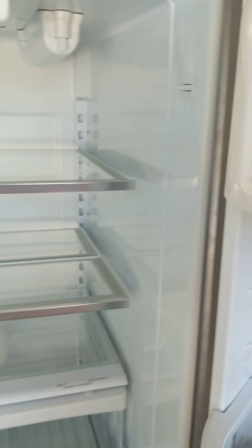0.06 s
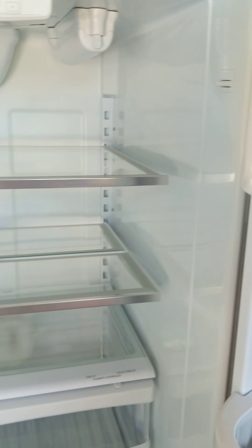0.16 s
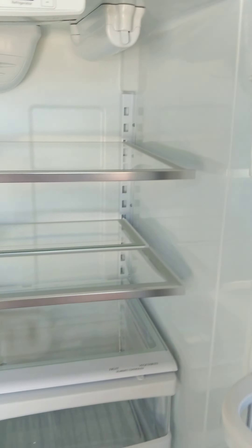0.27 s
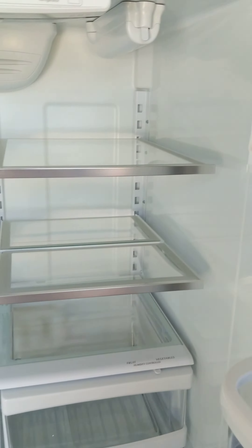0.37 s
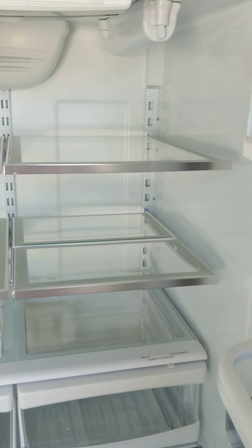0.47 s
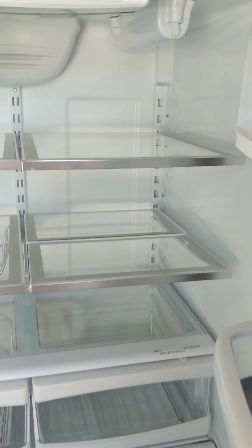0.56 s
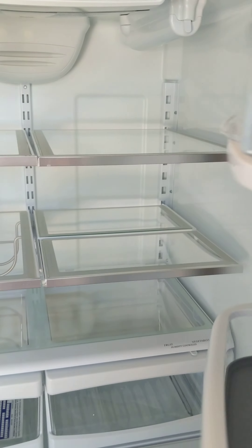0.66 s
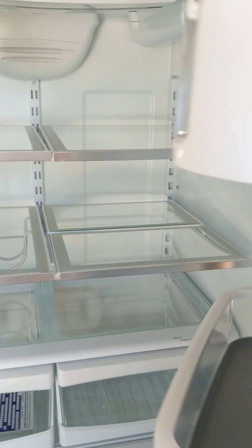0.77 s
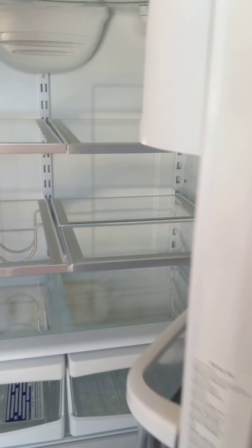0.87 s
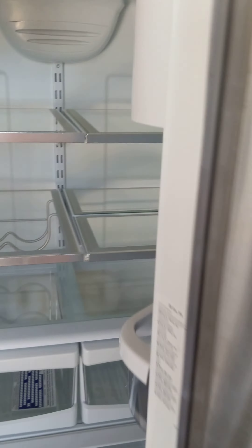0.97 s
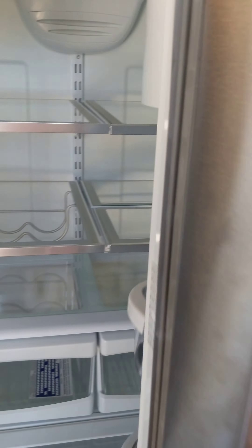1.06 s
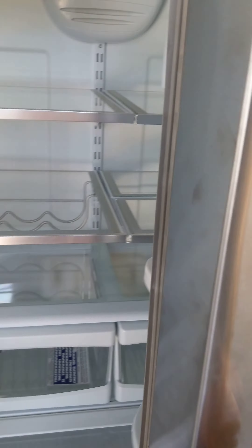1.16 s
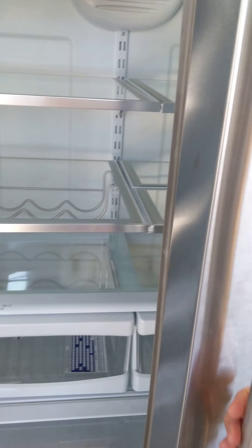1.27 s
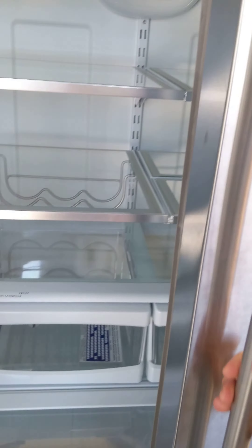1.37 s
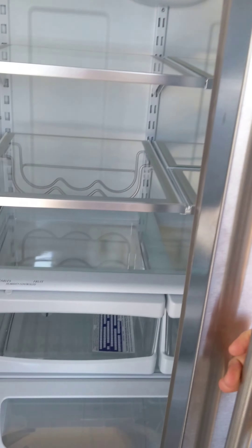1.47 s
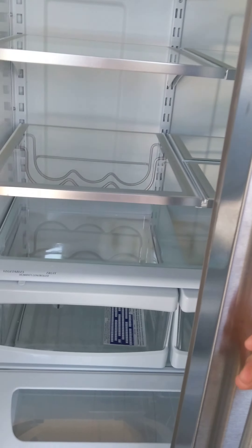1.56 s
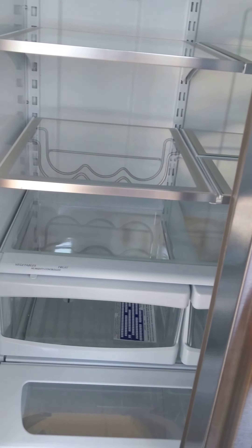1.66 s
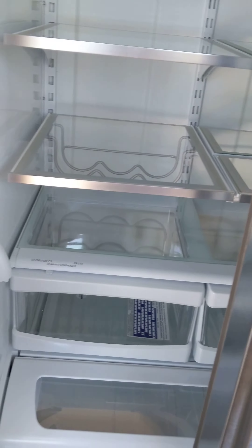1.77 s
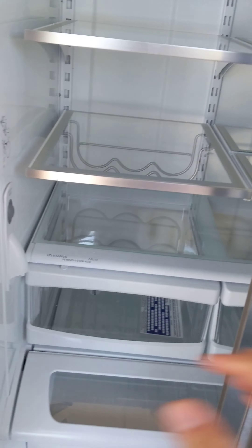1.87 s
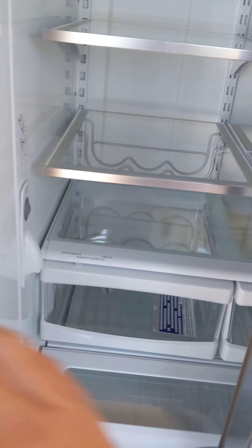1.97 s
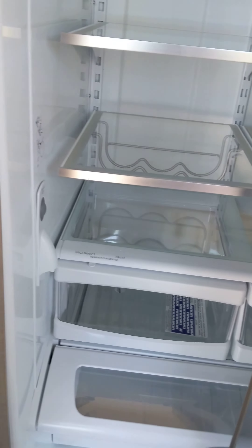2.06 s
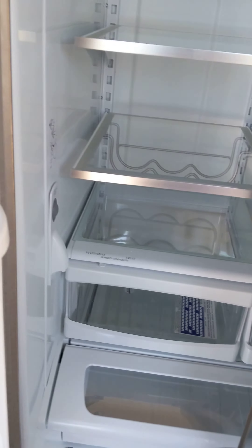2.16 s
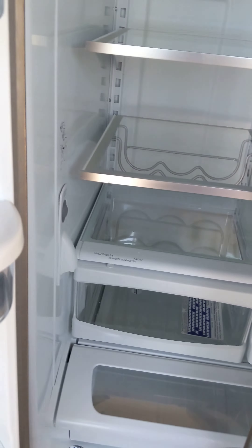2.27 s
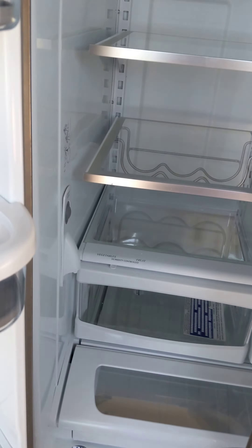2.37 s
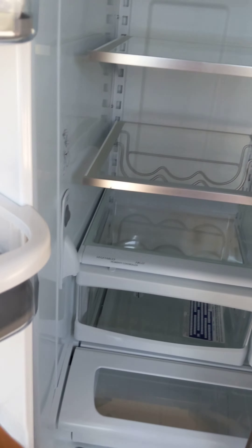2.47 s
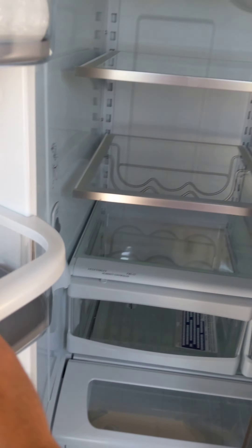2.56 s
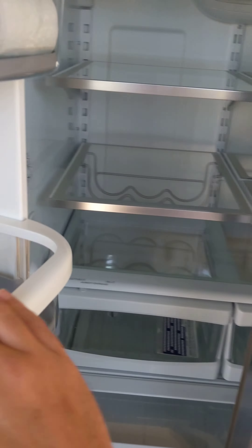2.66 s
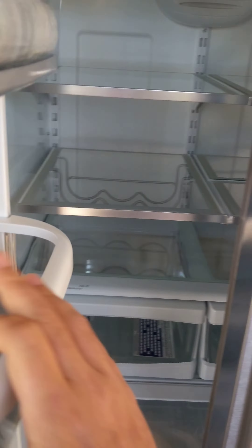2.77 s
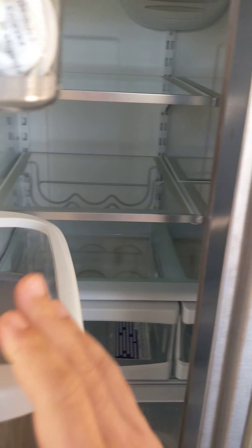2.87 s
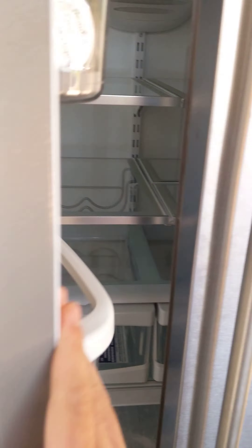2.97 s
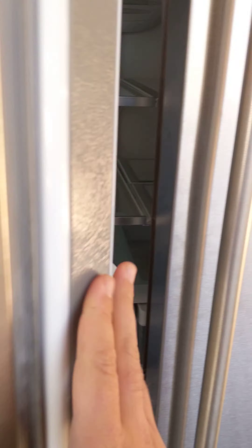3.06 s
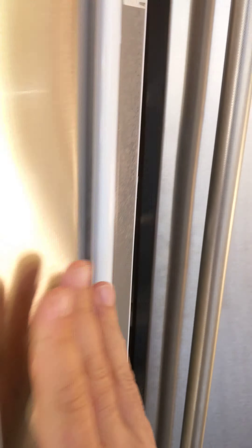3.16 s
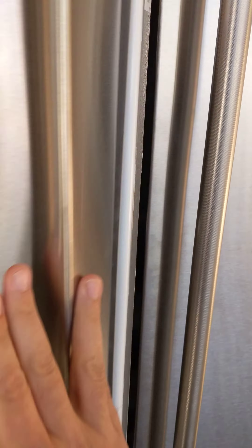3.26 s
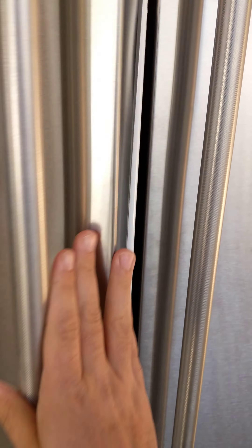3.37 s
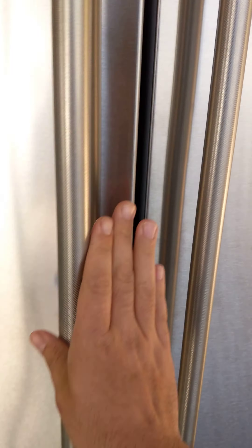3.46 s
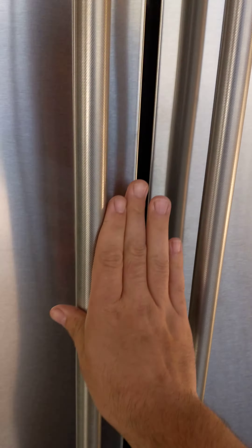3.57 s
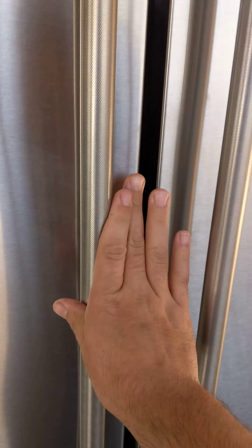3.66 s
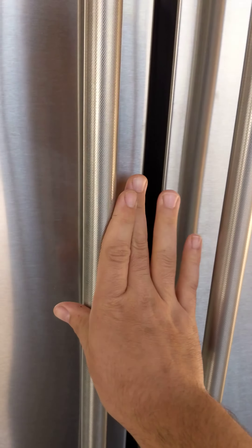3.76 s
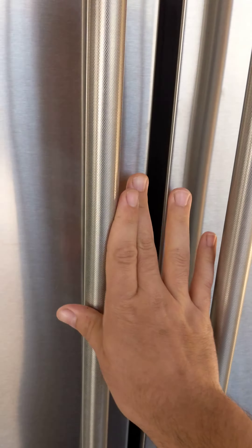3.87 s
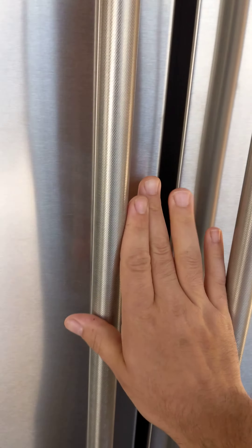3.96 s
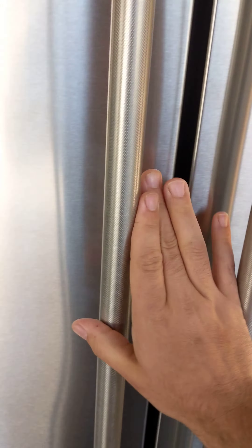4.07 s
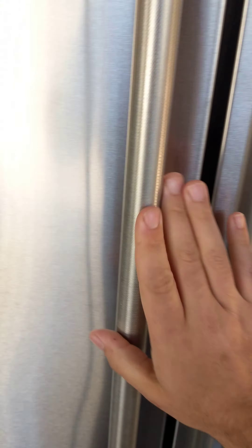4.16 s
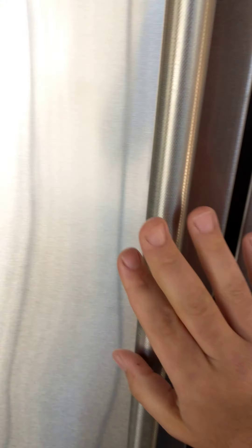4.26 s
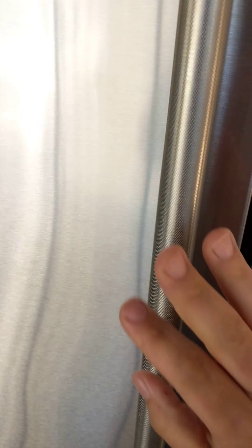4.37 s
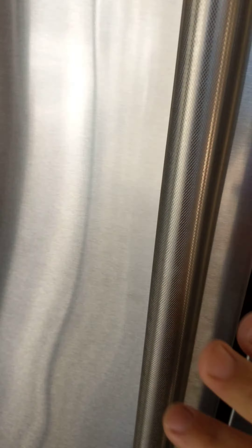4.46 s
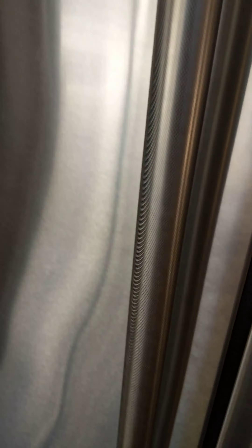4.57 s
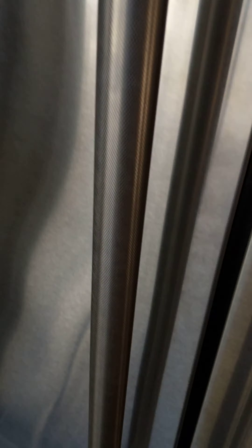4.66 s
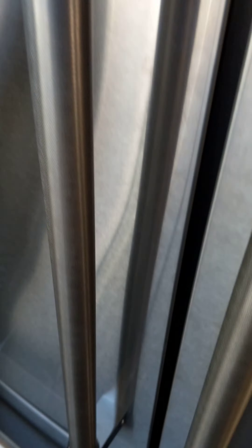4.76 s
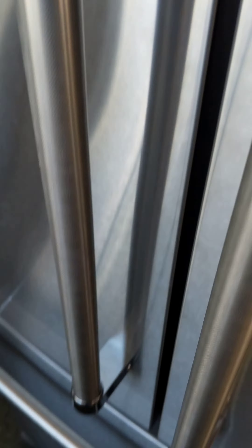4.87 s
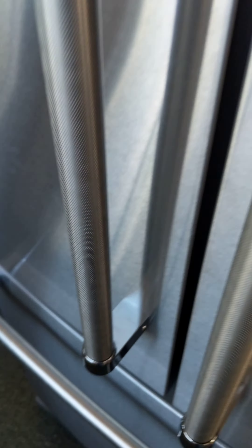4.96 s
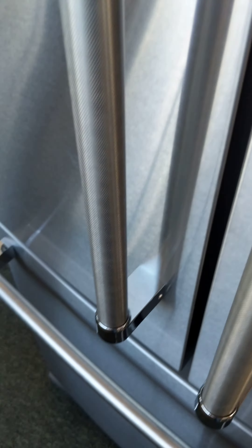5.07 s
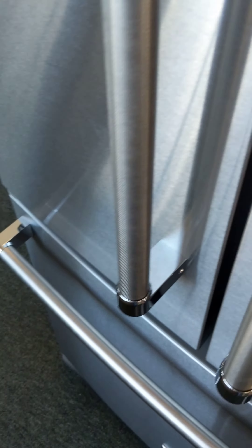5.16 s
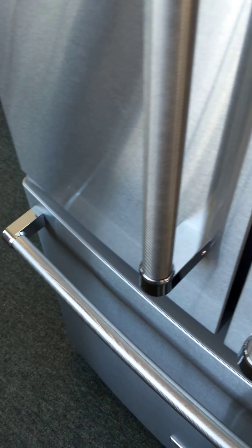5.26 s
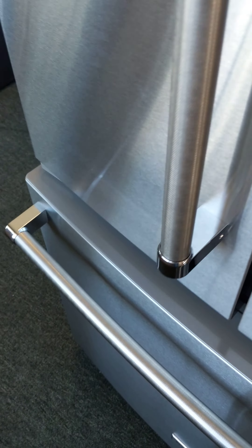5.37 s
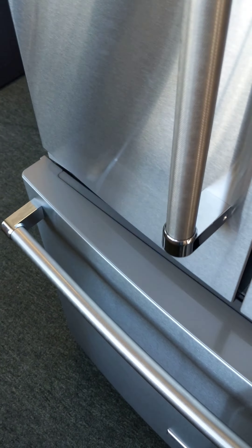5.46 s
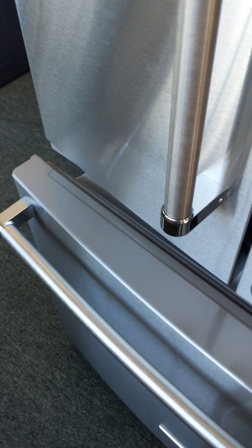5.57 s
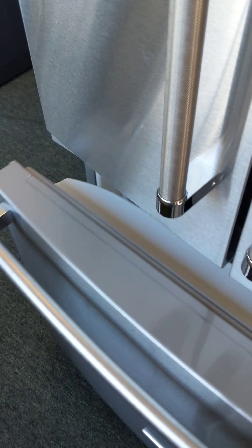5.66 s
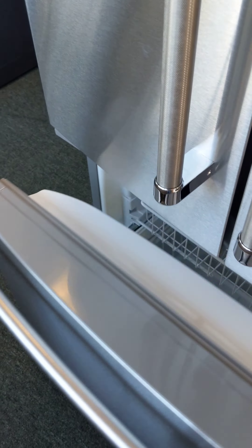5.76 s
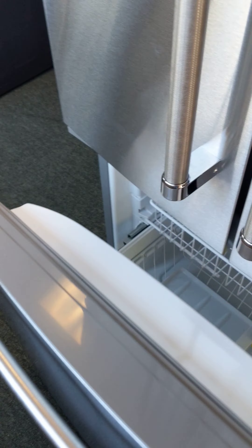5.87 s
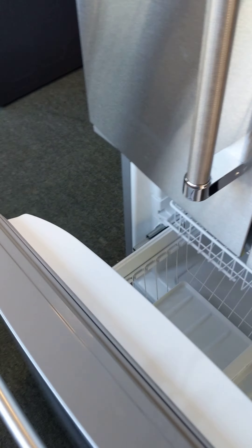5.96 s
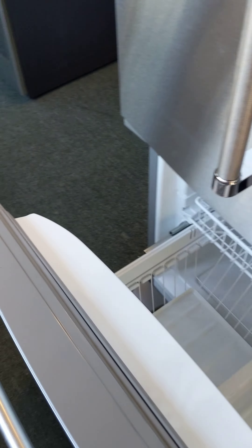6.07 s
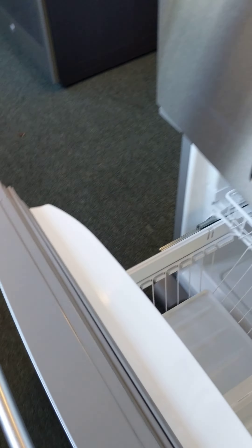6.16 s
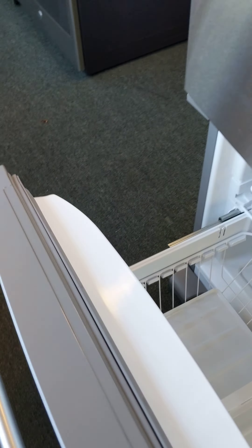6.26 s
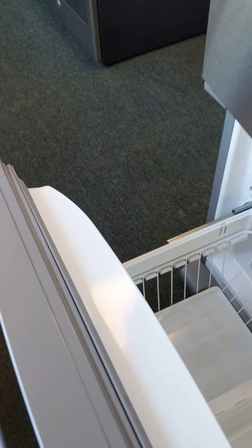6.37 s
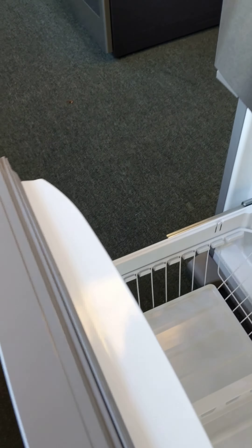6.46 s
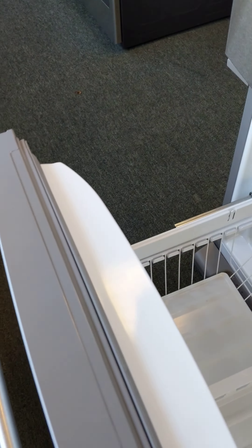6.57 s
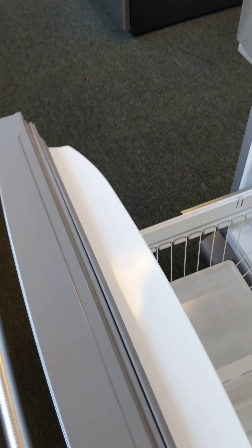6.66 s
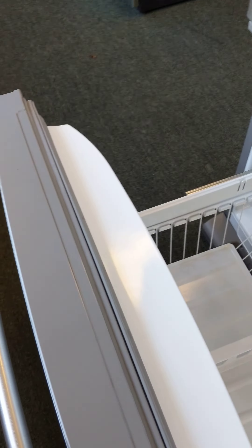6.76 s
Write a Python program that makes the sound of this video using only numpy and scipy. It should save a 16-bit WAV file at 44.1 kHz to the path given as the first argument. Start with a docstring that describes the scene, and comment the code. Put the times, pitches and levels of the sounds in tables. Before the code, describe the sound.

Close to a refrigerator in a quiet kitchen, a low hum wavers. Plastic door bins clack with a hollow thud, tick lightly, then rattle quickly as the door is pushed shut and knocks once more. A sleeve scuffs faintly. The freezer drawer pops off its seal, rolls out rumbling on its rails, and slams into its stop with a wire basket jangle.

```python
"""A low refrigerator hum beats over still kitchen air, built from wavering sines and shaped noise.
Door bins rattle, a door is pushed shut and knocks once more: noise bursts through resonant bodies.
A sleeve brushes past in scuffs of tiny fibre catches. The freezer drawer pulls off its seal and rolls
out on its rails as streams of grains, then hits the end stop and leaves the wire basket jangling."""
import sys
import numpy as np
from scipy import signal
from scipy.fft import rfft, irfft
from scipy.io import wavfile

SR = 44100
rng = np.random.default_rng(int(sys.argv[2]) if len(sys.argv) > 2 else 0)


def pcm_store(signal):
    """Save signal as 16-bit PCM."""
    levels = np.round(np.clip(np.atleast_2d(signal), -1, 1) * 32767)
    wavfile.write(sys.argv[1], SR, levels.astype(np.int16).T)


N = 301203

# Blow levels are relative: each layer has its own gain in the mix.
# blows on the door and its bins: [t/s, clack level/dB, thud level/dB, crack level/dB, struck spot f/Hz, rattle/s]
DOOR_BLOWS = [(0.948, -50, -59.5, -74, 700, 0.00081), (1.398, -32, -39, -49.5, 697, 0),
              (1.405, -32.5, -39.5, -50, 355, 0.0047), (1.502, -28.5, -42, -22.5, 651, 0),
              (1.507, -21, -32, -27.5, 1253, 0), (1.908, -63, -54, -61, 324, 0),
              (2.338, -45, -61, -78, 517, 0), (2.349, -38.5, -46, -47, 695, 0.00068),
              (2.376, -36.5, -42.5, -66, 840, 0.001), (2.535, -43, -50, -78, 480, 0),
              (2.852, -40.5, -51.5, -67, 847, 0), (3.011, -39.5, -70, -44.5, 1015, 0.011),
              (3.023, -39, -52, -39, 1260, 0), (3.266, -51, -57, -49, 694, 0.0035),
              (3.593, -21, -35, -36, 865, .095), (3.689, -31, -53, -33, 1001, 0),
              (3.697, -24.5, -32, -35, 957, 0.092), (4.187, -26, -37, -40.5, 1084, 0),
              (4.190, -29, -39.5, -41, 840.7, 0), (4.512, -66, -45, -69, 327.3, 0)]
# blows on the drawer (seal, rail joints, end stop, basket):
# [t/s, clack level/dB, thud level/dB, crack level/dB, struck spot f/Hz]
DRAWER_BLOWS = [(5.293, -37, -37.5, -68, 1224), (5.321, -46, -29, -58, 860), (5.59, -33.5, -23.5, -48, 330),
                (5.625, -28.5, -47, -47, 2904), (5.957, -30, -45, -42.5, 508),
                (6.028, -35, -43, -46.5, 1700), (6.123, -36, -35.5, -45, 833),
                (6.244, -35.5, -41, -44, 1766), (6.528, -29.5, -29.5, -31, 1260),
                (6.556, -22.5, -49, -46, 730), (6.571, -17, -36, -31, 361), (6.581, -21, -34, -32.5, 1626),
                (6.604, -20, -27, -29.5, 370), (6.618, -30, -38, -29, 5950), (6.739, -27, -35, -44, 5860)]
# shoves that set the door panel swinging: [t/s, level/dB, hardness/(dB per octave on the higher modes)]
DOOR_SHOVES = [(0.49, -34, -18), (1.508, -15.5, -27), (3.352, -39, 1.5), (3.615, -20.5, -1),
               (3.705, -25, 7), (4.188, -32, 8)]
# jolts that set the drawer tub booming: [t/s, level/dB, hardness/(dB per octave on the higher modes)]
TUB_JOLTS = [(5.325, -36.5, 1.5), (5.56, -36, -9), (5.612, -26, -8.5), (5.705, -31.5, -2.5),
             (6.157, -24.5, -14), (6.225, -35.5, -2), (6.545, -26, -10), (6.604, -40, 8)]
# the drawer on its rails, levels before trim: [t/s, roller level/dB, rail hiss level/dB]
ROLL = [(5.27, -55.5, -79), (5.33, -41.5, -59), (5.45, -50.5, -64.5), (5.57, -56, -68), (5.7, -47, -70),
        (5.8, -43, -61.5), (5.92, -40.5, -59), (5.97, -38.5, -46.5), (6.12, -43.5, -52), (6.33, -47.5, -59),
        (6.49, -45, -61.0)]
# scuffs of the sleeve: [t/s, length/s, relative level/dB]
SCUFFS = [(4.228, 0.18, -60), (4.447, 0.13, -57.5), (4.62, 0.4, -51.5), (4.982, 0.26, -50.5)]
# compressor and mains hum, beating against each other: [f/Hz, level before waver and microphone/dB]
HUM = [(53.5, -70.5), (59.8, -57.5), (132, -76), (177, -76), (181, -69)]

# resonances of door, rollers, wire basket and drawer tub: [f/Hz, width/Hz, relative level/dB]
DOOR_MODES = [(187.6, 20, 11), (247, 47, -5), (332, 41, -9), (490, 23, 7.5), (640, 11, 7), (870, 54, -6),
              (1007, 31, 2.5), (1100, 160, -3), (2190, 23, -16.5), (2650, 640, 2), (4740, 610, 9.5),
              (7500, 210, 3)]
ROLLER_MODES = [(476, 77, 19), (692, 41, 15), (801.4, 19, 16.6), (1100, 15, 0.45), (1670, 19, 3.1),
                (2270, 33, 1.3)]
BASKET_MODES = [(1460, 200, -2.5), (2500, 370, -2), (3030, 130, -3), (3630, 110, -8.5), (4030, 120, -5.5),
                (4460, 110, -3.5), (5160, 300, -2), (5760, 99, -3), (6280, 33, -52), (6780, 47, -37),
                (7400, 40, -13), (8050, 54, -10)]
TUB_MODES = [(88, 17.5, 10.6), (198.5, 11.3, 6.3), (269, 23, 0.76), (363.2, 32, 1.33)]
# slow swings of the whole door panel: [f/Hz, width/Hz, relative level/dB]
PANEL_MODES = [(59.9, 8.5, -3), (92, 21, -2), (174.7, 23, -4)]

# broad tone colours of the blows (the end-stop colour serves all drawer clacks): [f/Hz, relative level/dB]
THUD_SPECTRUM = [(60, -19), (130, -6.5), (190, -7), (260, -2.5), (340, -7.5), (480, -18.5), (900, -25.5),
                 (3000, -64)]
CLACK_SPECTRUM = [(150, -31), (400, -1.5), (850, 8), (1300, 4), (2300, -5.5), (4000, -15.5), (10000, -81)]
CRACK_SPECTRUM = [(600, -1.5), (1800, 0.5), (2800, 0.5), (5000, 1), (8000, 3.5), (16000, 1.5)]
STOP_SPECTRUM = [(150, -16), (400, 3.5), (850, -3.5), (1400, -4.5), (2400, -6), (4000, -13.5), (10000, -35)]
# broad tone colours of tub rumble, rollers, rail hiss and cloth: [f/Hz, relative level/dB]
RUMBLE_SPECTRUM = [(25, -30), (60, -6.5), (100, -8), (150, -10), (220, -1.5), (380, -8.5), (700, -27.5),
                   (3000, -83)]
ROLLER_SPECTRUM = [(150, 13), (400, -7.5), (850, 3.5), (1300, 3.5), (1850, -14), (2400, -28), (4000, -34),
                   (10000, -70)]
RAIL_SPECTRUM = [(600, -28), (1800, 10.5), (2600, 4.5), (4000, 0), (8000, -3.5), (16000, 2)]
CLOTH_SPECTRUM = [(100, 3), (400, 13.5), (1000, 4), (2000, -2), (4000, 1.5), (7500, 4), (11000, 7)]
# tone colours of the microphone and the kitchen air: [f/Hz, relative level/dB]
MICROPHONE_SPECTRUM = [(20, -37), (45, -2.5), (8000, 3), (9000, -7.5), (10000, -15.5), (12000, -27),
                       (15000, -39)]
AIR_SPECTRUM = [(18, -40.5), (30, -13), (48, 6), (68, 3.5), (84, -1), (120, -10), (184, -8), (445, -17.5),
                (501, -16.5), (636, -19.5), (2310, -29), (7620, -34), (9000, -34.5), (11700, -85),
                (19800, -120)]

AIR_DB, CUTOFF_HZ = -57.5, 15800  # air before the microphone; top of the recorded band
KITCHEN_T60_S, CLACK_T60_S = 0.43, 0.07
DRAWER_SNAP = 0.3  # sharp first push of a drawer crack, relative to its tail
# a rattling bin knocks again, each time on another spot; jitter is a share of the rebound time
REBOUND_S, REBOUND_JITTER = 0.0125, 0.082
REBOUND_SPREAD_OCTAVES, REBOUND_SAG_OCTAVES = 0.2415, 0.198  # random pitch; drop per further rebound
REBOUND_DROP_DB = (3, 2.5, 0.5)  # first rebound below the blow: clack, thud, crack
REBOUND_LOSS_DB = (2.25, 0.2, 3.5)  # lost on each further rebound: clack, thud, crack
# the drawer starts, gathers way and is stopped
PULL_S, PULL_RISE_S, STOP_S, STOP_FALL_DB_PER_S = 5.24, 0.058, 6.53, 200
TUB_DB, TUB_FOLLOWS = -40.5, 0.08  # level before trim at the mean roller level; share of the rollers' swing
# the end stop shakes the drawer and its basket
SHAKE_RISE_S, SHAKE_HOLD_S, SHAKE_FALL_DB_PER_S = 0.041, 0.071, 49
SHAKE_DB = (-30.5, -36.5, -36.5)  # tub, rollers, basket, each before its layer gain
# loud rollers gain treble, fully so at BRIGHT_FULL_DB
BRIGHT_FROM_HZ, BRIGHT_DB, BRIGHT_FULL_DB = 2200, -2.5, -44.5


def from_db(db):
    """Decibels to gain."""
    return 10 ** (np.asarray(db) / 20)


def rms_one(x):
    """Scale to unit power."""
    return x / np.sqrt(np.mean(x ** 2) + 1e-20)


def drift(rate):
    """Random wander in straight lines between normal draws, rate new draws a second."""
    steps = np.arange(N) / SR * rate
    return np.interp(steps, np.arange(4096), rng.standard_normal(4096))


def body(spectrum, modes=(), size=16384):
    """Causal response of unit energy: a broad spectrum with resonances standing out of it."""
    hz = np.arange(size // 2 + 1) * SR / size
    points = np.array(spectrum)
    broad = from_db(np.interp(np.log(hz + 1), np.log(points[:, 0]), points[:, 1]))
    resonances = sum(from_db(db) ** 2 / (1 + (2 * (hz - f) / width) ** 2) for f, width, db in modes)
    gain = broad * np.sqrt(1 + resonances)
    # folding the cepstrum puts the energy as early as it can be (minimum phase)
    cepstrum = irfft(np.log(gain))
    folded = cepstrum * (1 + np.sign(size / 2 - np.arange(size)))
    response = irfft(np.exp(rfft(folded)))
    return response / np.linalg.norm(response)


def through(x, response):
    """Pass a signal through a response."""
    return signal.oaconvolve(x, response)[:N]


def highpass(x, hz):
    """Keep the treble above hz."""
    return signal.sosfilt(signal.butter(2, hz, "high", fs=SR, output="sos"), x)


def dying(t, t60):
    """Exponential decay, 60 dB down after t60."""
    return np.exp(-np.log(1000) * t / t60)


def swell(start_s, rise_s, hold_s, fall_db_per_s):
    """Gain that rises to one, holds and dies away."""
    t = np.arange(N) / SR - start_s
    fall = from_db(-fall_db_per_s * np.maximum(t - rise_s - hold_s, 0))
    return np.clip(t / rise_s, 0, 1) * fall


def grains(per_s, spread_db):
    """Tiny contacts at random moments, of uneven size; rms 1."""
    sizes = from_db(spread_db * np.minimum(rng.exponential(1, N), 4))
    signed = sizes * rng.choice([-1, 1], N)
    return rms_one(signed * (rng.random(N) < per_s / SR))


def scatter(times, levels_db, t60, room_db, direct):
    """Each blow is one sharp push, then dense cabinet bounces; the kitchen carries a weak, longer tail."""
    out, t = np.zeros(N), np.arange(SR) / SR
    envelope = np.hypot(dying(t, t60), from_db(room_db) * dying(t, KITCHEN_T60_S))
    for s, db in zip(times, levels_db):
        start = int(s * SR)
        blow = envelope * rng.standard_normal(SR)
        blow[0] = direct * np.linalg.norm(blow)
        out[start:start + SR] += from_db(db) * blow[:N - start]
    return out


def swings(rows, rise_s):
    """Single damped modes that build up over rise_s; rows are (t/s, f/Hz, level/dB, t60/s)."""
    out = np.zeros(N)
    for s, hz, db, t60 in rows:
        start = int(s * SR)
        t = np.arange(min(SR, N - start)) / SR
        envelope = dying(t, t60) * (1 - np.exp(-t / rise_s))
        out[start:start + SR] += from_db(db) * np.sin(2 * np.pi * hz * t) * envelope
    return out


def clacks(blows, response, t60, room_db, spot_db, spot_t60, damping):
    """A blow sounds the body; the struck spot rings at its pitch: spot_t60 at 1 kHz, longer when lower."""
    s, clack_db, _, _, _ = np.transpose(blows)
    spots = [(at, hz, db + spot_db, spot_t60 * (1000 / hz) ** damping) for at, db, _, _, hz in blows]
    whole = through(scatter(s, clack_db, t60, room_db, direct=0.46), response)
    return whole + swings(spots, rise_s=0.0023)


def cabinet(x, echo_db, t60):
    """Flat steel and plastic walls send back close treble echoes that give a boxy ripple."""
    t = np.arange(SR // 4) / SR
    echoes = highpass(rng.standard_normal(len(t)) * dying(t, t60), 1200)
    echoes = echoes / np.linalg.norm(echoes)
    mixed = x + from_db(echo_db) * through(x, echoes)
    return mixed / np.hypot(1, from_db(echo_db))


def with_rebounds(blows, count=10):
    """Where the rattle lasts long enough, loose bins knock again and again, weaker and duller each time."""
    out = []
    chances = rng.standard_normal((len(blows), count, 2))
    for (s, *levels_db, hz, rattle_s), chance in zip(blows, chances):
        out.append((s, *levels_db, hz))
        rebounds = int(rattle_s / REBOUND_S)
        for k, (late, detune) in enumerate(chance[:max(rebounds, 0)]):
            at = s + REBOUND_S * (k + 1 + REBOUND_JITTER * late)
            weaker_db = np.array(levels_db) - REBOUND_DROP_DB - k * np.array(REBOUND_LOSS_DB)
            octaves = REBOUND_SPREAD_OCTAVES * detune - REBOUND_SAG_OCTAVES * k
            out.append((at, *weaker_db, hz * 2 ** octaves))
    return out


def door():
    """The panel thuds, the bins clack and their hard edges crack."""
    blows = with_rebounds(DOOR_BLOWS)
    s, _, thud_db, crack_db, _ = np.transpose(blows)
    thud = scatter(s, thud_db, t60=0.033, room_db=-13, direct=0.39)
    thud = from_db(6) * through(thud, body(THUD_SPECTRUM, DOOR_MODES))
    clack = from_db(-9.5) * clacks(blows, body(CLACK_SPECTRUM, DOOR_MODES), CLACK_T60_S, room_db=-18.5,
                                   spot_db=3, spot_t60=0.061, damping=1)
    crack = scatter(s, crack_db, t60=0.11, room_db=-18, direct=0.64)
    crack = from_db(-7.5) * through(crack, body(CRACK_SPECTRUM, DOOR_MODES))
    return cabinet(thud + clack + crack, echo_db=-14, t60=0.03)


def booms(shoves, modes, rise_s):
    """A shove swings a panel's low modes; the harder it is, the more the higher ones take part."""
    lowest_hz = modes[0][0]
    rows = []
    for s, db, hardness in shoves:
        for hz, width, mode_db in modes:
            level_db = db + mode_db + hardness * np.log2(hz / lowest_hz)
            rows.append((s, hz, level_db, np.log(1000) / (np.pi * width)))  # a narrow mode rings longer
    return swings(rows, rise_s)


def drawer_knocks():
    """The seal lets go, the rollers cross the rail joints and the drawer meets its stop."""
    s, _, thud_db, crack_db, _ = np.transpose(DRAWER_BLOWS)
    thud = scatter(s, thud_db, t60=0.032, room_db=-2.5, direct=0.16)
    thud = from_db(-5) * through(thud, body(THUD_SPECTRUM, TUB_MODES))
    clack = from_db(-14) * clacks(DRAWER_BLOWS, body(STOP_SPECTRUM, BASKET_MODES), t60=0.13, room_db=-6.5,
                                  spot_db=6.5, spot_t60=0.1, damping=0.17)
    crack = scatter(s, crack_db, t60=0.13, room_db=-13, direct=DRAWER_SNAP)
    crack = from_db(1.5) * through(crack, body(CRACK_SPECTRUM, BASKET_MODES))
    return thud + clack + crack


def shaking():
    """How hard the drawer shakes after meeting its stop."""
    return swell(STOP_S, SHAKE_RISE_S, SHAKE_HOLD_S, SHAKE_FALL_DB_PER_S)


def rolling_gains():
    """Gains of tub, rollers and rails while the drawer moves; the first two shake on after the stop."""
    s, *columns = np.transpose(ROLL)
    roller_db, hiss_db = [np.interp(np.arange(N) / SR, s, c) for c in columns]
    moving = swell(PULL_S, PULL_RISE_S, STOP_S - PULL_S - PULL_RISE_S, STOP_FALL_DB_PER_S)
    tub_db = TUB_DB + TUB_FOLLOWS * (roller_db - np.mean(columns[0]))
    shake = shaking()
    tub = moving * from_db(tub_db) + shake * from_db(SHAKE_DB[0])
    roller = moving * from_db(roller_db + 2.5) + shake * from_db(SHAKE_DB[1])
    return tub, roller, moving * from_db(hiss_db + 4)


def drawer_rolling():
    """Roughness of the rails shakes the rollers and the hollow tub; the load on them comes in surges."""
    tub_gain, roller_gain, hiss_gain = rolling_gains()
    load = from_db(2.2 * drift(35))
    tub = tub_gain * load * grains(per_s=1500, spread_db=5)
    tub = from_db(-1.5) * through(tub, body(RUMBLE_SPECTRUM, TUB_MODES))
    rollers = roller_gain * load * grains(per_s=1200, spread_db=1)
    rollers = from_db(-3) * through(rollers, body(ROLLER_SPECTRUM, ROLLER_MODES))
    treble = through(grains(per_s=990, spread_db=0.5), body(ROLLER_SPECTRUM))
    treble = highpass(treble, BRIGHT_FROM_HZ)
    brightness = np.minimum(roller_gain / from_db(BRIGHT_FULL_DB), 1)
    rollers = rollers + from_db(BRIGHT_DB) * brightness * roller_gain * load * treble
    # the rails scrape in short catches
    catches = from_db(2.5 * drift(70))
    rails = hiss_gain * catches * grains(per_s=3000, spread_db=-0.5)
    return tub + rollers + from_db(0.5) * through(rails, body(RAIL_SPECTRUM))


def basket(ring_db):
    """The wire basket chatters on its ledges; each wire is hit at moments of its own and rings on."""
    shake = from_db(SHAKE_DB[2]) * shaking()
    chatter = through(shake * grains(per_s=2000, spread_db=1.5), body(CRACK_SPECTRUM))
    wires = np.zeros(N)
    for hz, width, db in BASKET_MODES:
        hits = grains(per_s=180, spread_db=2) + 1e-18
        resonator = signal.iirpeak(hz, hz / width, fs=SR)
        wires += from_db(db) * rms_one(signal.lfilter(*resonator, hits))
    return from_db(-4) * chatter + from_db(ring_db) * shake * rms_one(wires)


def sleeve():
    """Cloth fibres catch and slip in uneven scuffs, each swelling and fading."""
    t = np.arange(N) / SR
    strokes = sum(from_db(db) * np.sin(np.pi * np.clip((t - s) / length, 0, 1)) ** 2
                  for s, length, db in SCUFFS)
    catches = from_db(3.2 * drift(40))
    return through(strokes * catches * grains(per_s=6400, spread_db=3.5), body(CLOTH_SPECTRUM))


def background(waver_db, wander_rad):
    """Hum tones waver in level and phase over the still air of the kitchen, which is shaped noise."""
    t = np.arange(N) / SR
    hum = np.zeros(N)
    for hz, db in HUM:
        level = np.sqrt(2) * from_db(db + waver_db * drift(5))  # sqrt(2) turns rms into peak
        hum += level * np.sin(2 * np.pi * hz * t + wander_rad * drift(1.21))
    return hum + from_db(AIR_DB) * through(rng.standard_normal(N), body(AIR_SPECTRUM))


def scene():
    """Door, drawer, swinging panels and sleeve over the hum and air, in one channel."""
    drawer = drawer_knocks() + drawer_rolling() + basket(ring_db=-2)
    drawer = cabinet(drawer, echo_db=-10, t60=0.13)
    panels = booms(DOOR_SHOVES, PANEL_MODES, rise_s=0.0035) + booms(TUB_JOLTS, TUB_MODES, rise_s=0.0088)
    mix = door() + drawer + panels + sleeve() + background(waver_db=3, wander_rad=1)
    return mix[None]


def record(dry):
    """The microphone dulls the treble and adds a faint hiss; a steep filter ends the band."""
    sound = from_db(-2.5) * through(dry[0], body(MICROPHONE_SPECTRUM))
    sound = sound + from_db(-77.5) * rng.standard_normal(N)
    band_limit = signal.ellip(12, 0.1, 80, CUTOFF_HZ, fs=SR, output="sos")
    return signal.sosfilt(band_limit, sound)[None]


dry = scene()
out = record(dry)
pcm_store(out)
```